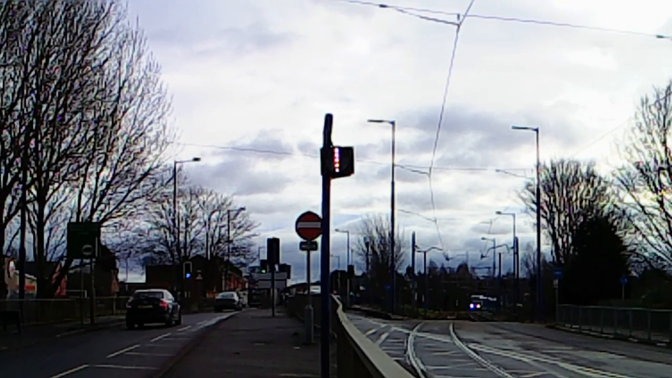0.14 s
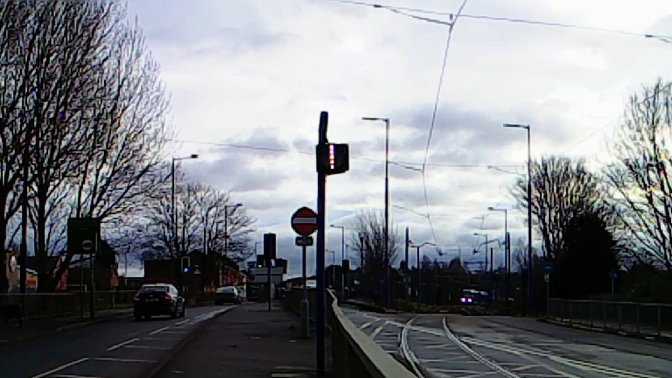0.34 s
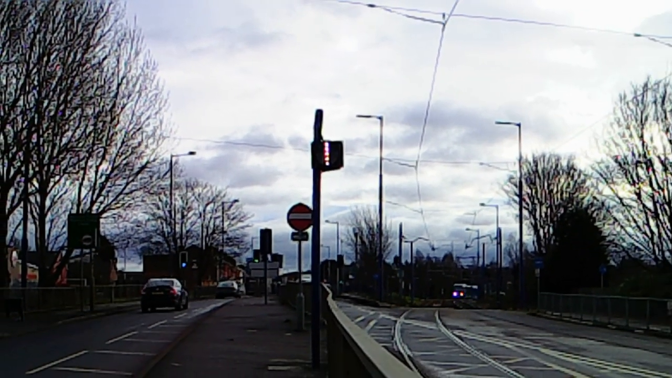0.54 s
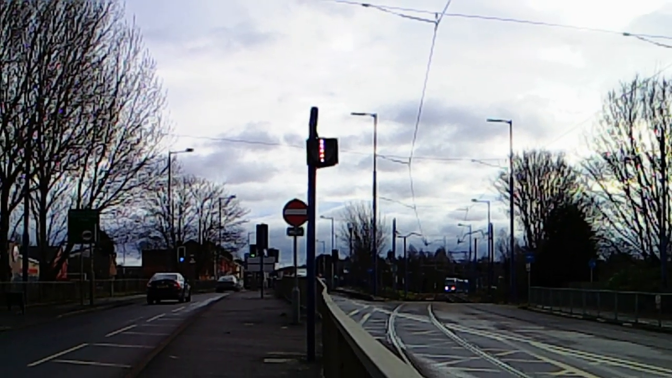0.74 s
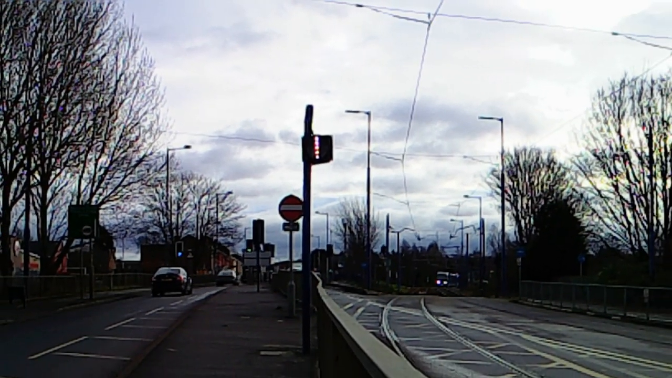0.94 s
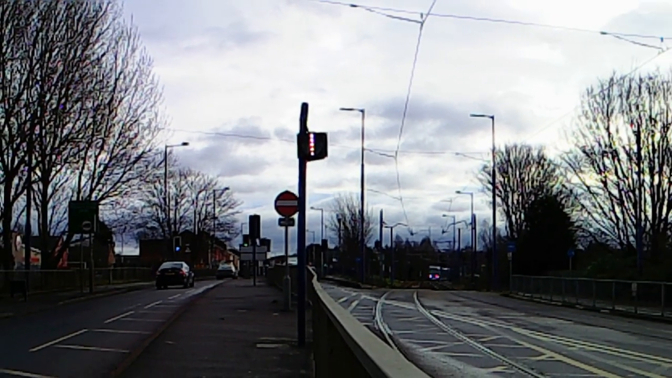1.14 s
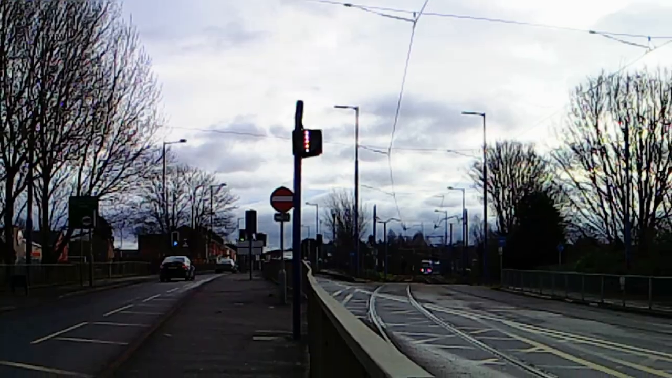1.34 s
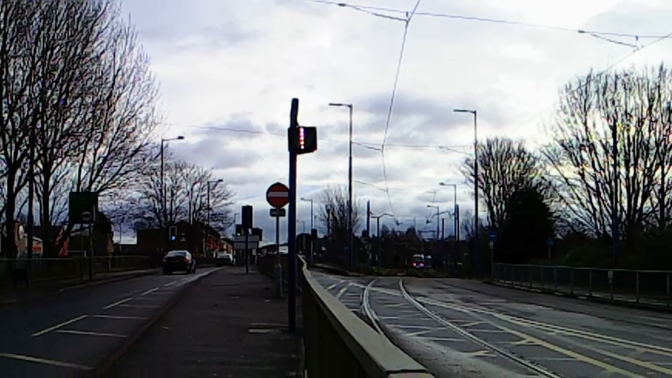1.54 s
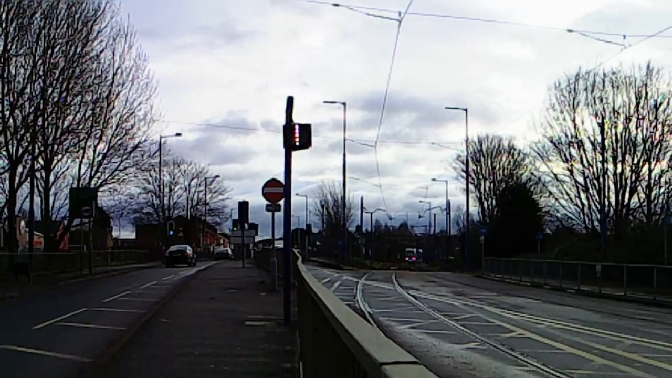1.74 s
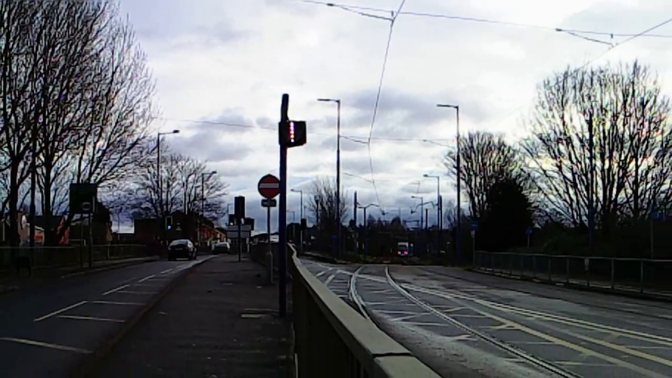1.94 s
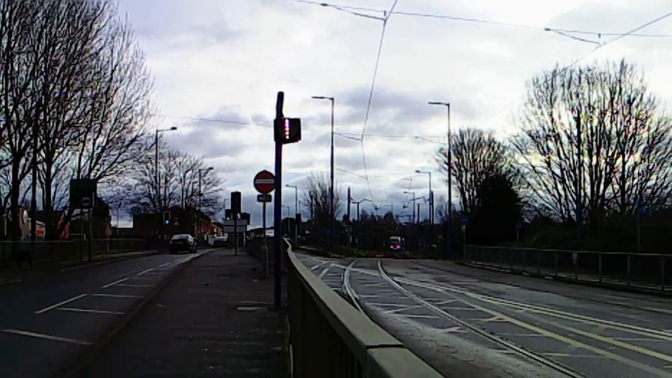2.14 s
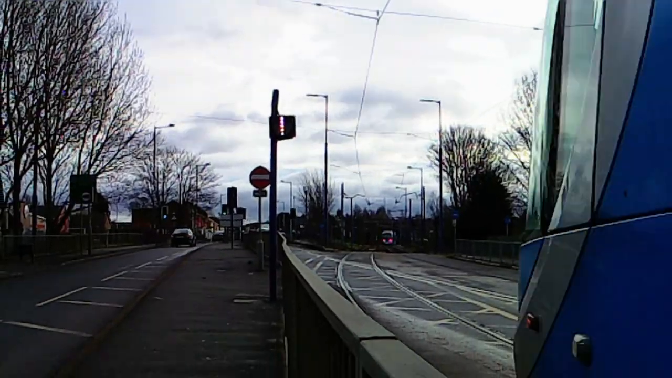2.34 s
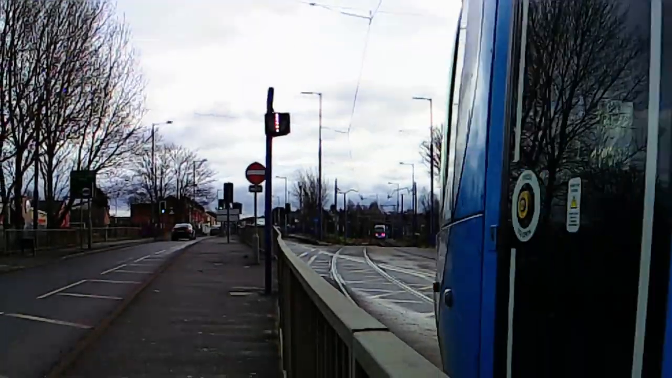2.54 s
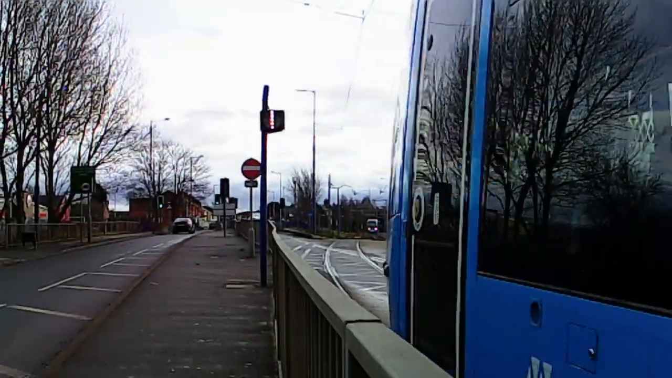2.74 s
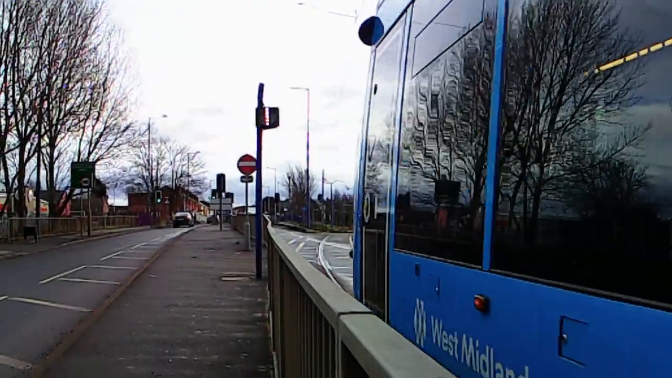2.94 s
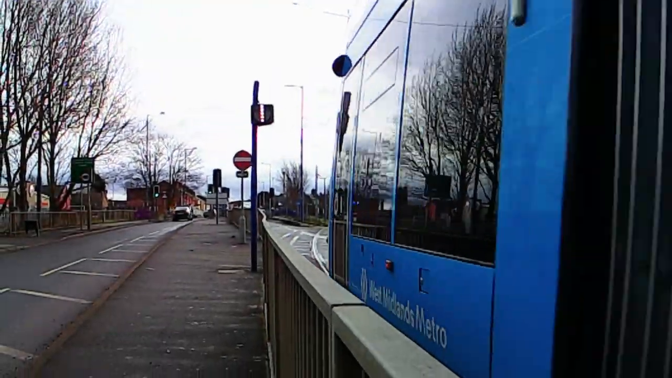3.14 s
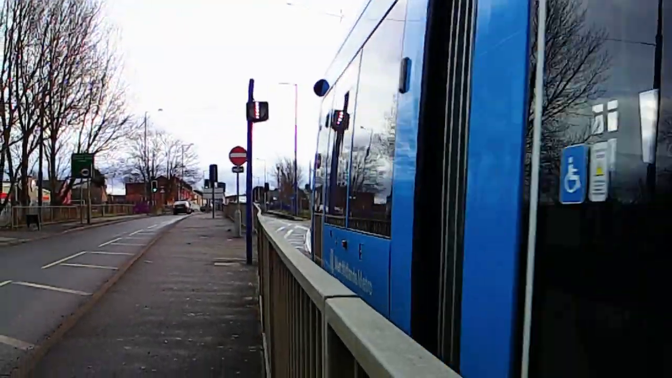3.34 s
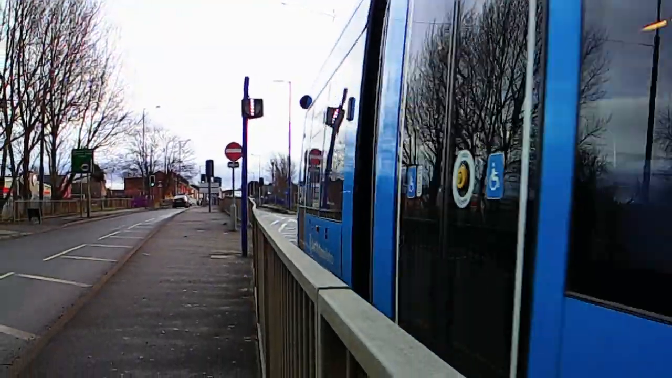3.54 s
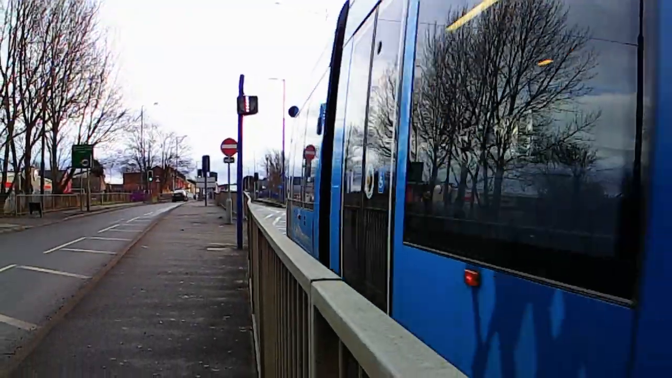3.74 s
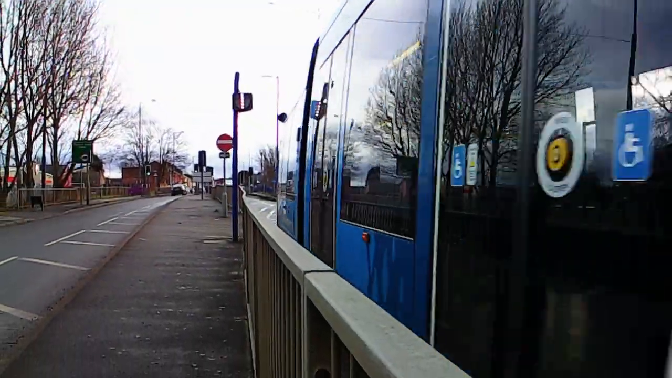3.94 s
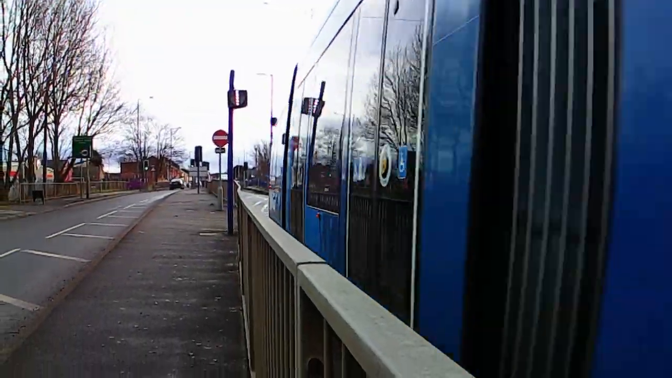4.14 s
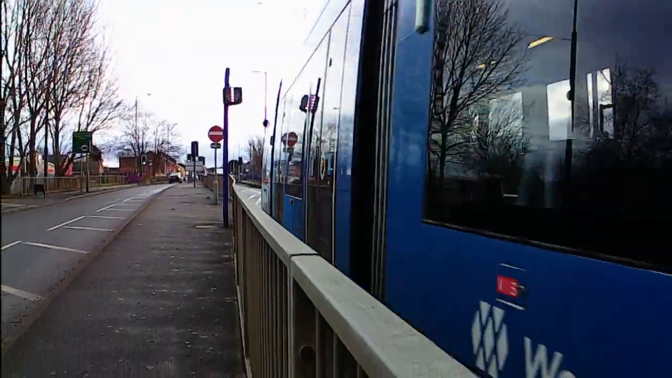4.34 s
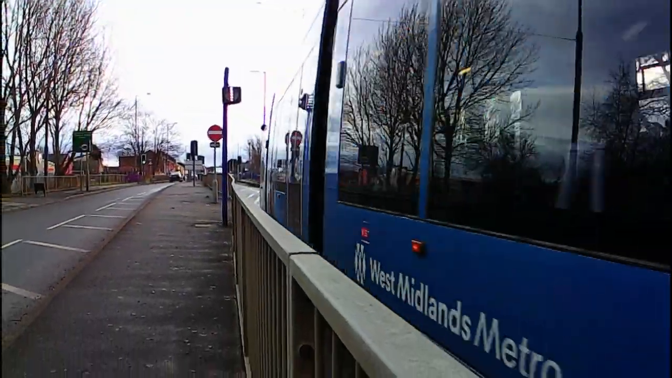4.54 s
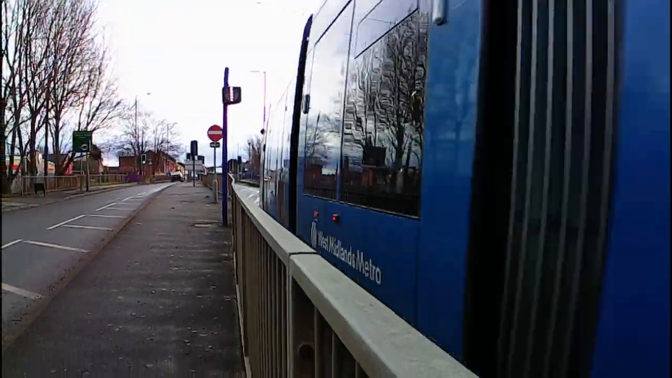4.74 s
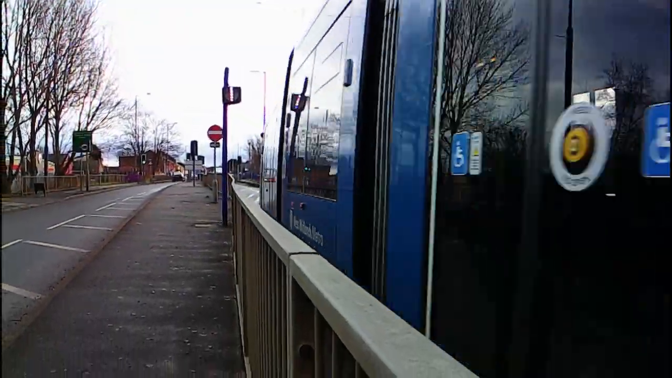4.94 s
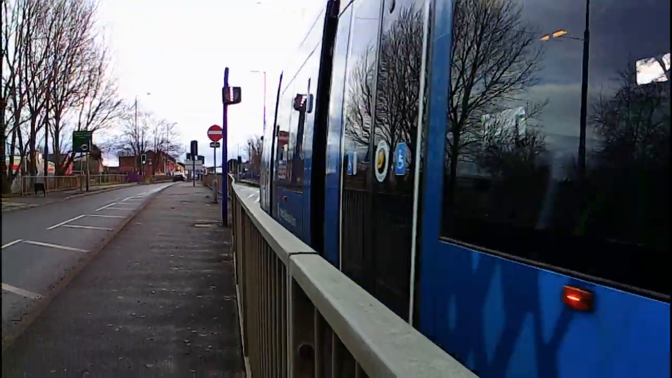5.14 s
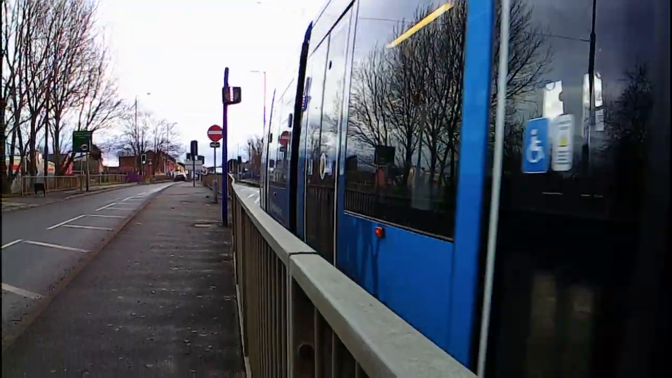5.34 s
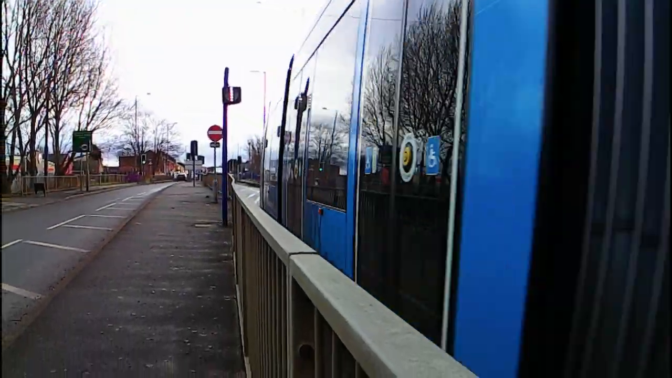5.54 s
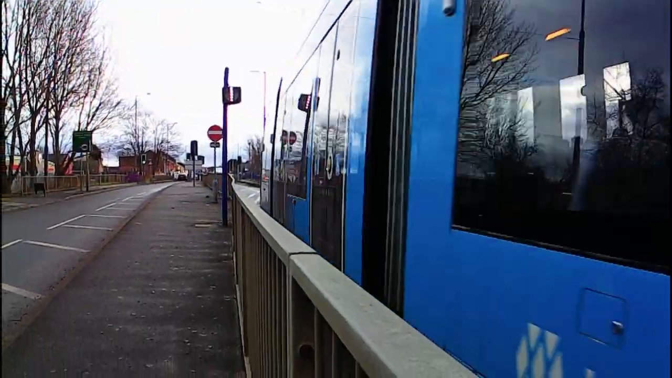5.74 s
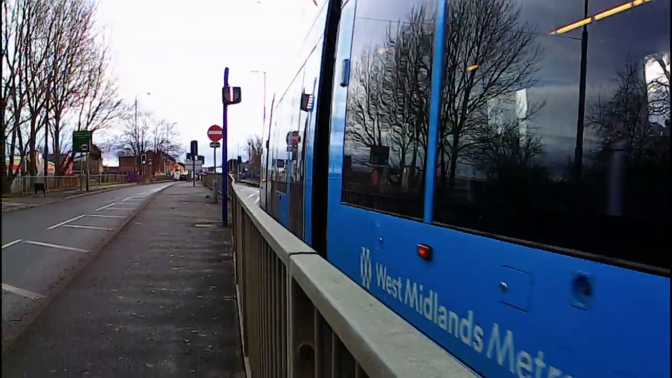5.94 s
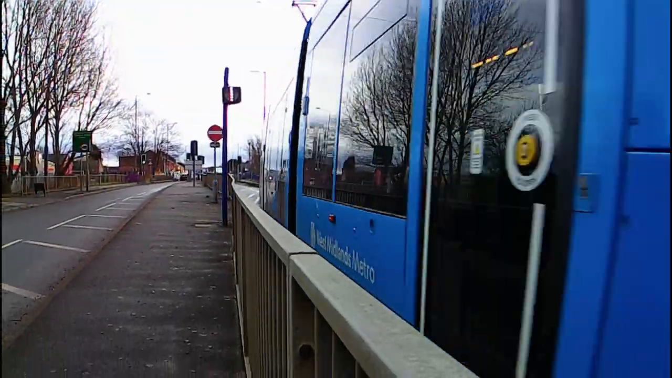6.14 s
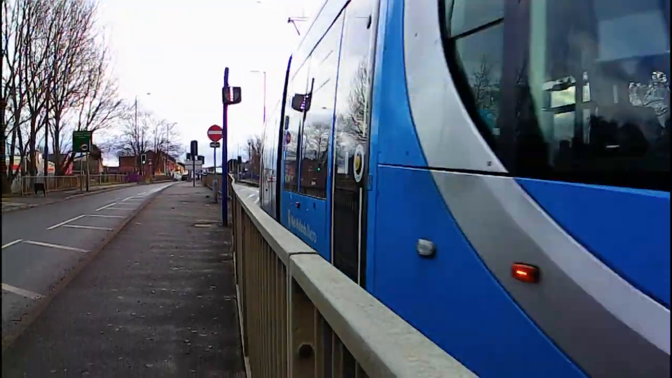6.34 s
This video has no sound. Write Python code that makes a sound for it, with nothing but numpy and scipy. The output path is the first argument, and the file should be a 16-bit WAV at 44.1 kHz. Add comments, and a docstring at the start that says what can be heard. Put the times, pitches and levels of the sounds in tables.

```python
"""Three tram bogies roll past at arm's length, each a swell of coloured noise with ringing wheels and gliding tones.
Noise through the resonances of slab and rails makes the track rumble and sing; a deep boom swells with the body.
Short wavering tones surge within the rolling sound, and a narrow noise band chirps with the shaft's turns
at the tram's nose and tail.
Thin drive whines, ticks, scuffs and a late sizzle give close detail over the broad wash of distant cars."""
import sys
import numpy as np
from scipy import signal
from scipy.fft import rfft, irfft, next_fast_len
from scipy.io import wavfile
from scipy.ndimage import map_coordinates

SR = 44100
rng = np.random.default_rng(int(sys.argv[2]) if len(sys.argv) > 2 else 0)


def master_out(mix):
    """Clip the mix to full scale and print it as 16-bit PCM to the path in sys.argv[1]."""
    frames = np.transpose(np.atleast_2d(mix))
    ceiling = np.clip(frames, -1, 1)
    pcm = np.round(ceiling * 32767).astype(np.int16)
    wavfile.write(sys.argv[1], SR, pcm)


N = 285768
TIME = np.arange(N) / SR  # seconds

# Levels within each colour or set of resonances are relative: the noise is scaled to unit power.
# Colour of distant traffic: (frequency [Hz], level [dB])
STREET_COLOUR = [(20, -7.5), (60, -11.5), (95, -17), (150, 1), (260, 1.5), (470, -14), (680, -20),
                 (930, -5.5), (1200, -6), (1700, -9), (2400, -21.5), (3100, -29.5), (4300, -34.5),
                 (5300, -47.5)]

# Two drive whines heard from afar: (time [s], pitch [Hz], level [dB])
UPPER_WHINE = [(0, 2385, -68), (.27, 2362, -60.5), (.42, 2370, -60), (.72, 2360, -55.5), (.82, 2360, -63),
               (1.1, 2385, -59), (1.5, 2336, -61), (2.3, 2306, -55), (3.1, 2330, -75)]
LOWER_WHINE = [(0, 2270, -67), (.7, 2255, -68), (.88, 2260, -57), (1.12, 2214, -55), (1.3, 2144, -56.5),
               (1.6, 2170, -56), (2.2, 2217, -61), (3.1, 2070, -72)]
# Resonances of the trailing sizzle: (frequency [Hz], width [Hz], level [dB])
SIZZLE_MODES = [(6370, 1400, 4.5), (8300, 420, -6.5)]

# Sharp ticks: (time [s], level [dB], decay time [s], lowest frequency [Hz])
TICKS = [(2.305, -50, 0.003, 4800), (3.286, -40.5, 0.005, 1600)]
# Colour of the ticks: (frequency [Hz], level [dB])
TICK_COLOUR = [(1500, 0), (2700, 7), (4500, -8), (6000, -11), (8000, -23), (10000, -29)]

# Short rubs and rattles: (time [s], level [dB], spread in time [s], share of hiss in the power [0 to 1])
SCUFFS = [(3.787, -54, 0.013, .05), (3.824, -44.5, .002, .05), (3.834, -46.5, 0.008, 0.052),
          (3.877, -50, 0.011, .07), (3.93, -58, 0.0076, .05), (4.084, -54, .003, .5),
          (4.14, -49, 0.0027, .15), (6.345, -54, .006, 1), (6.358, -44.5, 0.0048, 0.87),
          (6.37, -42, 0.0049, 0.78), (6.382, -47, 0.0039, 0.82), (6.397, -47, 0.01, 0.86)]
# Colour of their hiss: (frequency [Hz], level [dB])
SCUFF_AIR = [(1200, -13.5), (2400, 9.5), (4900, -5), (5800, -1.5), (7200, -4), (9000, -10.5),
             (11000, -15.5)]
# Resonances of the rubs, and of the rattle within the hiss: (frequency [Hz], width [Hz], level [dB])
SCUFF_MODES = [(3920, 45, 3.5), (4170, 100, -4), (4360, 60, 1.5), (4700, 70, -3.5), (5870, 520, -27)]
RATTLE_MODES = [(3390, 90, -2), (3840, 110, -1.5), (4150, 110, -8), (4800, 200, 0), (6820, 200, -10),
                (7260, 60, -12), (11400, 120, -13)]

# A rub on the drive shaft at each end of the tram:
# (loudest time [s], pitch [Hz], level [dB], rise [dB/s], fall [dB/s])
CHIRPS = [(2.028, 6370, -65.5, 21, 21), (6.138, 6880, -67, 22.5, 29)]
TURNS_PER_S = 24.85  # drive shaft speed

# Hum of the rails while the tram is some way off: (time [s], pitch [Hz], level [dB])
RAIL_HUM = [(0, 955, -45), (.15, 956, -50), (.45, 935, -45.5), (.9, 950, -53.5), (1.35, 964, -38.5),
            (1.7, 956, -41), (1.95, 921, -37.5), (2.3, 927, -60)]

# Slab resonances, before the load of the bogies bends their pitch: (frequency [Hz], width [Hz], level [dB])
SLAB_MODES = [(225, 27, -7.5), (285, 76, -7), (357, 82, 1), (391.5, 39, -0.5)]
# Rail resonances on the approach, beside the tram and just ahead of each bogie:
# (frequency [Hz], width [Hz], level [dB])
FAR_RAIL_MODES = [(805, 120, -1.5), (901, 85, 3.5), (967, 58, 6.5)]
NEAR_RAIL_MODES = [(769, 61, 5.5), (882, 55, 4.5), (1020, 220, -11)]
FORERUN_MODES = [(1023, 70, 0)]
# Colour of the ground rumble: (frequency [Hz], level [dB])
RUMBLE_COLOUR = [(20, -44), (35, -33.5), (50, -17), (65, -6.5), (90, -6), (120, 4.5), (155, -1), (210, 2),
                 (300, -7.5), (600, -82)]
# How each bogie, front to rear, shakes the track, before the layer trims:
# (ground rumble [dB], slab [dB], rail [dB], slab's loss along the track [dB/s])
SHAKES = [(-34, -27, -34.5, 14), (-43.5, -27, -36.5, 20), (-36, -26.5, -27.5, 35)]
THROBS_PER_S = 9.34  # beat of the singing rail on the approach

# Colour of the body boom: (frequency [Hz], level [dB])
BOOM_COLOUR = [(20, -56.5), (38, -26.5), (50, 5), (64, 14), (95, 16.5), (120, 13), (180, -54.5)]
BOOM_FROM_S, BOOM_UNTIL_S = 4.03, 5.15  # the middle of the body is alongside and booms most

# Brief surges in the track's rumble and ringing: (time [s], level [dB], mean pitch [Hz], spread in time [s])
SURGES = [(0.273, -41.5, 200, 0.015), (1.353, -36, 976, 0.011), (1.557, -32, 939, 0.0056),
          (1.953, -30.5, 796, 0.022), (2.078, -37, 785, 0.018), (2.214, -34, 1020, 0.019),
          (2.332, -29, 979, 0.013), (2.594, -23.5, 387, 0.018), (2.711, -24, 185, 0.026),
          (2.836, -28, 775, 0.018), (3.008, -31.5, 105, 0.018), (3.12, -24.5, 340, 0.04),
          (3.436, -32.5, 220, 0.03), (4.045, -25.5, 928, 0.019), (4.225, -26.5, 398, 0.024),
          (4.295, -25, 398, 0.021), (4.382, -31, 118.3, 0.02), (4.581, -32.5, 538, 0.042),
          (4.609, -26, 785, 0.022), (4.622, -32.5, 92, 0.02), (4.72, -27, 385, 0.019),
          (5.455, -28.5, 419, 0.019), (5.658, -25, 506, 0.021), (5.817, -23.5, 387, 0.011),
          (5.82, -30.5, 138, 0.02), (5.86, -25.5, 527, 0.011), (5.915, -25, 419, 0.025),
          (5.954, -29, 764, 0.012), (5.989, -27, 645, 0.014), (6.046, -31, 122, 0.025)]

# Tones of each bogie's motor, gears and wheels: (pitch when abreast [Hz], level [dB],
# glide to either side [share of pitch], loudest time after abreast [s], swell time [s])
FRONT_TONES = [(794, -31.5, .016, 0.23, .33), (798, -41.5, 0.0037, -0.61, .4),
               (1745, -36.5, .06, 0.048, 0.26), (1827, -39.5, .035, 0.4, 0.19),
               (1870, -36.5, .08, -0.06, 0.27), (2080, -45, .053, .1, 0.36), (2205, -40, .085, 0.061, .32),
               (2227, -43.5, .04, -.4, 0.17), (2400, -46.5, .07, 0.13, 0.35), (4100, -54, .02, 0.13, 0.37)]
MIDDLE_TONES = [(871, -32, .01, -.12, 0.19), (923, -40, .01, -0.43, 0.57), (916, -33.5, .011, .42, 0.38),
                (1700, -38, .015, -0.012, 0.27), (1730, -34.5, 0.013, 0.2, .3),
                (1783, -35.5, .018, -.17, .3), (1980, -46, .018, -.16, .3), (2800, -51, .02, -0.28, 0.18),
                (3040, -58.5, .015, 0.2, .3)]
REAR_TONES = [(793, -33, .02, .3, .3), (844, -31.5, .015, -.05, .3), (895, -33, 0.014, .55, 0.34),
              (1750, -40.5, .012, .6, .3), (3550, -56.5, .01, 0.004, 0.36), (4520, -62, .008, -.05, .3)]

# Bogies, front to rear: (time abreast [s], level [dB], time to travel one listening distance [s],
# treble beaming [exponent of distance], wheel ring against roar [dB])
BOGIES = [(2.65, -31.5, .45, 1.42, -8), (4.38, -31, .52, 1.2, -9.5), (5.80, -27.5, .45, 0.7, -11)]
# Roar of each bogie: (frequency [Hz], level [dB])
FRONT_ROAR = [(40, -31), (200, -2.5), (440, -2), (650, 1.5), (900, 1.5), (1250, -5), (1600, -4.5),
              (2100, -6), (2500, -12.5), (3100, -21.5), (3750, -18), (4250, -16.5), (5300, -33.5),
              (7000, -42.5), (9000, -48.5)]
MIDDLE_ROAR = [(100, -12.5), (250, 1), (480, -2), (650, 1), (1000, 2.5), (1300, -5), (1600, -1),
               (2000, -8.5), (2500, -17), (3100, -24.5), (4300, -22.5), (5600, -36.5), (7500, -50.5),
               (9500, -74)]
REAR_ROAR = [(100, -10), (250, 4.5), (430, 1.5), (640, 3.5), (870, -0.5), (1250, -2.5), (1600, -1.5),
             (2050, -8), (2600, -18), (3300, -21.5), (4400, -22), (5600, -37.5), (7500, -59.5),
             (9500, -69.5)]
# Ringing wheels: (frequency [Hz], width [Hz], level [dB])
WHEEL_MODES = [(1706, 55, 0.5), (1828, 120, 1.5), (1923, 130, -10.5), (2750, 70, -11), (3100, 41, -11),
               (3544, 32, -17.5), (4040, 34, -18)]
MACH = .02  # tram speed over the speed of sound

CUTOFF_HZ = 11000  # steep upper limit of the microphone's sound


def from_db(db):
    """Turn decibels into gain."""
    return 10 ** (np.asarray(db) / 20)


def rms_one(x):
    """Scale to unit power."""
    return x / np.sqrt(np.mean(x ** 2) + 1e-20)


def in_time(rows):
    """Draw each column of a timed curve at every sample."""
    s, *columns = np.transpose(rows)
    return [np.interp(TIME, s, c) for c in columns]


def noise(gain_at):
    """Shape unit-power noise by a gain that is a function of frequency."""
    size = next_fast_len(N, True)
    hz = np.maximum(np.fft.rfftfreq(size, 1 / SR), 1)
    spectrum = rfft(rng.standard_normal(size)) * gain_at(hz)
    return rms_one(irfft(spectrum, size)[:N])


def coloured(points):
    """Noise with a smooth spectrum, drawn in dB over log frequency."""
    at, level_db = np.transpose(points)
    return noise(lambda hz: from_db(np.interp(np.log(hz), np.log(at), level_db)))


def resonant(modes):
    """Resonances shaken by random roughness, with steep skirts."""
    def gain_at(hz):
        power = 0
        for f, width, db in modes:
            detuning = (hz * hz - f * f) / (2 * hz * width)
            power = power + (from_db(db) / (1 + detuning ** 2)) ** 2
        return np.sqrt(power)
    return noise(gain_at)


def drift(rate_hz, size=8192):
    """Slow random movement of unit power, mostly below the given rate."""
    hz = np.fft.rfftfreq(size, N / SR / size)
    slow = irfft(rfft(rng.standard_normal(size)) / (1 + (hz / rate_hz) ** 4), size)
    return rms_one(np.interp(np.arange(N) * size / N, np.arange(size), slow))


def swell(at, spread_s):
    """A brief bell-shaped rise and fall."""
    return np.exp(-.5 * np.minimum(((TIME - at) / spread_s) ** 2, 100))


def approach(arrival, rise_db_per_s):
    """Gain of a source that draws near and then stays."""
    return from_db(-rise_db_per_s * np.maximum(arrival - TIME, 0))


def passage(start, end, rise_db_per_s, fall_db_per_s):
    """Gain of a source that draws near, holds from start to end and recedes."""
    receding = from_db(-fall_db_per_s * np.maximum(TIME - end, 0))
    return approach(start, rise_db_per_s) * receding


def bent(sound, pitch):
    """Play a steady sound at a changing pitch ratio."""
    return map_coordinates(sound, [np.cumsum(pitch)], order=3, mode="mirror")


def rough_tone(hz, wander_hz, waver_db, stray=0.001985):
    """A sine whose pitch jitters and slowly strays, and whose level wavers."""
    moving_hz = hz * (1 + stray * drift(3.966)) + wander_hz * drift(33.16)
    phase = 2 * np.pi * np.cumsum(moving_hz) / SR
    return rms_one(from_db(waver_db * drift(20.3))) * np.sin(phase)


def carried(levels_db, loss_db_per_s, spread_s, lag_s):
    """Vibration under the three bogies dies away along the track; their powers add."""
    abreast = np.transpose(BOGIES)[0]
    away_s = np.hypot(TIME[:, None] - abreast - lag_s, spread_s) - abs(spread_s)
    return np.linalg.norm(from_db(levels_db - loss_db_per_s * away_s), axis=1)


def street(level_db=-47, unrest_db=2.0):
    """Distant cars merge into a broad wash whose level flutters slightly."""
    return from_db(level_db + unrest_db * drift(25)) * coloured(STREET_COLOUR)


def running_gear(whine_width_hz=55, sizzle_db=-69, sizzle_from_s=5.87):
    """Two narrow noise bands glide as blurred drive whines; a sizzle grows and then holds."""
    whine = 0
    for pitch, level_db in map(in_time, [UPPER_WHINE, LOWER_WHINE]):
        band = resonant([(pitch[0], whine_width_hz, 0)])
        whine = whine + from_db(level_db) * bent(band, pitch / pitch[0])
    sizzle = from_db(sizzle_db) * approach(sizzle_from_s, rise_db_per_s=6.5) * resonant(SIZZLE_MODES)
    return whine + sizzle


def ticks():
    """Small hard contacts start at once and die within milliseconds."""
    out, crack = np.zeros(N), coloured(TICK_COLOUR)
    for at, level_db, decay_s, low_hz in TICKS:
        high_pass = signal.butter(3, low_hz, "high", fs=SR, output="sos")
        burst = rms_one(signal.sosfilt(high_pass, crack))
        decay = np.exp(-np.minimum(np.abs(TIME - at) / decay_s, 20))
        out += from_db(level_db) * burst * (TIME >= at) * decay
    return out


def scuffs(rough_db=1.0, chatter_hz=220, rattle_db=0.0):
    """Short chattering rubs ring near 4 kHz; the brighter ones hiss and rattle."""
    grain = rms_one(from_db(rough_db * drift(chatter_hz)))
    body = resonant(SCUFF_MODES)
    air = rms_one(coloured(SCUFF_AIR) + from_db(rattle_db) * resonant(RATTLE_MODES))
    out = np.zeros(N)
    for at, level_db, spread_s, share in SCUFFS:
        share = np.clip(share, 0, 1)
        mix = np.sqrt(1 - share) * body + np.sqrt(share) * air
        out += from_db(level_db) * swell(at, spread_s) * mix
    return grain * out


def chirps(width_hz=170, dip_db=10):
    """The rubbing shaft squeaks once per turn, in a narrow band."""
    out = np.zeros(N)
    for at, hz, level_db, rise, fall in CHIRPS:
        rub_db = dip_db * .5 * (np.cos(2 * np.pi * TURNS_PER_S * (TIME - at)) - 1)
        squeak = resonant([(hz, width_hz, 0)])
        out += from_db(level_db + rub_db) * passage(at, at, rise, fall) * squeak
    return out


def rail_hum(wander_hz=24, waver_db=4.5):
    """A narrow, wavering hum runs along the rails far ahead of the wheels."""
    pitch, level_db = in_time(RAIL_HUM)
    return from_db(level_db) * rough_tone(pitch, wander_hz, waver_db)


def slab_ring(stiffening=.09, reach_s=.42, lead_s=.1, slack_share=.05):
    """The slab's resonances rise under the weight of each bogie and sag between them."""
    load = sum(swell(at - lead_s, reach_s) for at, *_ in BOGIES)
    return bent(resonant(SLAB_MODES), 1 - slack_share + stiffening * load)


def rail_ring(arrival_s=1.73, handover_s=0.38, far_share=0.13, far_db=-1.35, near_db=-5,
              throb_db=3.5, throb_at=1.556, throb_s=0.37):
    """Rail resonances throb on the approach, then mostly give way to those beside the tram."""
    arrived = .5 * (1 + np.tanh((TIME - arrival_s) / handover_s))
    near = np.clip(1 - far_share, 0, 1) * arrived  # share of the power
    beat = np.cos(2 * np.pi * THROBS_PER_S * (TIME - throb_at)) - 0.3
    throb = from_db(throb_db * swell(throb_at, throb_s) * beat)
    far_rail = from_db(far_db) * np.sqrt(1 - near) * throb * resonant(FAR_RAIL_MODES)
    near_rail = from_db(near_db) * np.sqrt(near) * resonant(NEAR_RAIL_MODES)
    return far_rail + near_rail


def track(rumble_trim_db=-4.0, slab_trim_db=-2.5, singing_db=-34.5, forerun_db=-40):
    """Wheels shake ground, slab and rails; one rail resonance peaks ahead of each bogie."""
    ground_dbs, slab_dbs, rail_dbs, slab_losses = np.transpose(SHAKES)
    ground = carried(ground_dbs, loss_db_per_s=11.0, spread_s=0.37, lag_s=0.11)
    slab = carried(slab_dbs, slab_losses, spread_s=0.3, lag_s=0.012)
    # the rails sing along the whole tram, and harder under each bogie
    along = from_db(singing_db) * approach(arrival=1.73, rise_db_per_s=12.5)
    rail = np.hypot(along, carried(rail_dbs, loss_db_per_s=14.0, spread_s=0.68, lag_s=0.072))
    # a negative lag puts the peak before the bogie
    ahead = carried(forerun_db, loss_db_per_s=38.5, spread_s=0.064, lag_s=-0.31)
    rumble = from_db(rumble_trim_db) * ground * coloured(RUMBLE_COLOUR)
    slab_sound = from_db(slab_trim_db) * slab * slab_ring()
    return rumble + slab_sound + rail * rail_ring() + ahead * resonant(FORERUN_MODES)


def body_boom(level_db=-45.5, far_db=-60):
    """A deep boom over a faint floor grows while the tram's body is alongside."""
    alongside = passage(BOOM_FROM_S, BOOM_UNTIL_S, rise_db_per_s=7.0, fall_db_per_s=10.0)
    return np.hypot(from_db(far_db), from_db(level_db) * alongside) * coloured(BOOM_COLOUR)


def surges(wander_hz=22, rough_db=2):
    """The rolling sound surges briefly around one wavering pitch."""
    out = np.zeros(N)
    for at, level_db, hz, spread_s in SURGES:
        turns = np.cumsum(hz + wander_hz * drift(30.5)) / SR
        phase = 2 * np.pi * (turns + rng.random())
        out += from_db(level_db + rough_db * drift(40)) * swell(at, spread_s) * np.sin(phase)
    return out


def bogie_tones(reach_s=.5, falloff=2.82, wander_share=.014, waver_db=3.5):
    """Each bogie's tones glide down as it goes by; each is beamed ahead or behind and swells in its turn."""
    out = np.zeros(N)
    for (at, *_), tones in zip(BOGIES, [FRONT_TONES, MIDDLE_TONES, REAR_TONES]):
        along = (TIME - at) / reach_s
        receding = along / np.hypot(1, along)  # from -1 ahead to +1 behind
        for hz, level_db, glide, lag_s, beam_s in tones:
            tone = rough_tone(hz * (1 - glide * receding), wander_share * hz, waver_db)
            off_beam = np.hypot(1, (TIME - at - lag_s) / beam_s)
            out += from_db(level_db) * tone / off_beam ** falloff
    return out


def bogie_roar(beam_hz=2000, falloff=1.2, grit_db=1.5, grit_hz=150):
    """Each bogie roars and rings, louder and brighter when abreast, dropping slightly in pitch as it passes."""
    out = np.zeros(N)
    split = signal.butter(1, beam_hz, fs=SR, output="sos")
    for (at, level_db, reach_s, beaming, ring_db), colour in zip(BOGIES, [FRONT_ROAR, MIDDLE_ROAR, REAR_ROAR]):
        distance = np.hypot(1, (TIME - at) / reach_s)  # in listening distances
        roar = coloured(colour) + from_db(ring_db) * resonant(WHEEL_MODES)
        # the changing travel time through the air bends the pitch
        travel_s = MACH * reach_s * distance
        roar = map_coordinates(roar, [(TIME - travel_s) * SR], order=3, mode="mirror")
        low = signal.sosfiltfilt(split, roar)
        # gritty treble escapes sideways from under the skirts
        grit = rms_one(from_db(grit_db * drift(grit_hz)))
        high = (roar - low) * distance ** -beaming * grit
        out += from_db(level_db) * (low + high) / distance ** falloff
    return out


def scene():
    """The tram rolls by in front of steady distant traffic."""
    small_parts = running_gear() + ticks() + scuffs() + chirps()
    rolling = rail_hum() + track() + body_boom() + surges() + bogie_tones() + bogie_roar()
    return (street() + small_parts + rolling)[None]


def record(dry, hiss_db=-74, bass_cut_hz=42, dull_hz=9700):
    """A small microphone with faint hiss, thin in the deep bass and dull at the top."""
    bass_cut = signal.butter(3, bass_cut_hz, "high", fs=SR, output="sos")
    dulling = signal.butter(6, dull_hz, fs=SR, output="sos")
    top_cut = signal.ellip(10, .1, 80, CUTOFF_HZ, fs=SR, output="sos")
    heard = dry + from_db(hiss_db) * rng.standard_normal(dry.shape)
    for stage in (bass_cut, dulling, top_cut):
        heard = signal.sosfilt(stage, heard)
    return heard


dry = scene()
out = record(dry)
master_out(out)
```